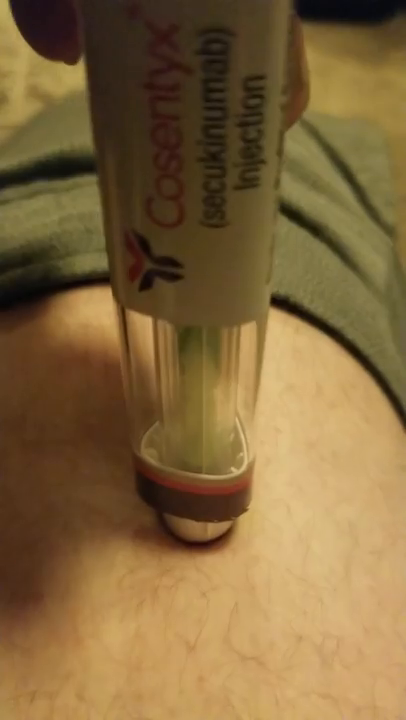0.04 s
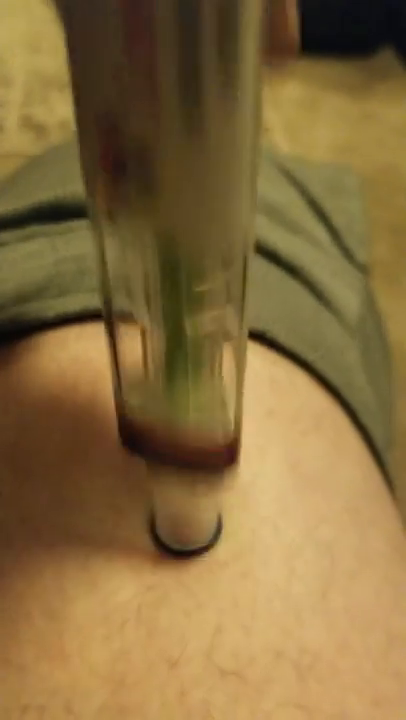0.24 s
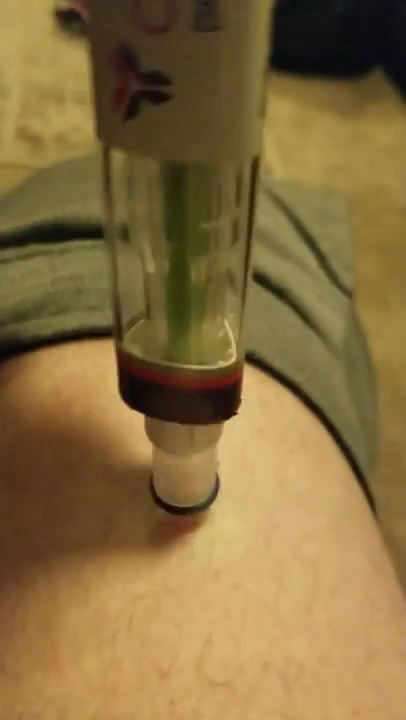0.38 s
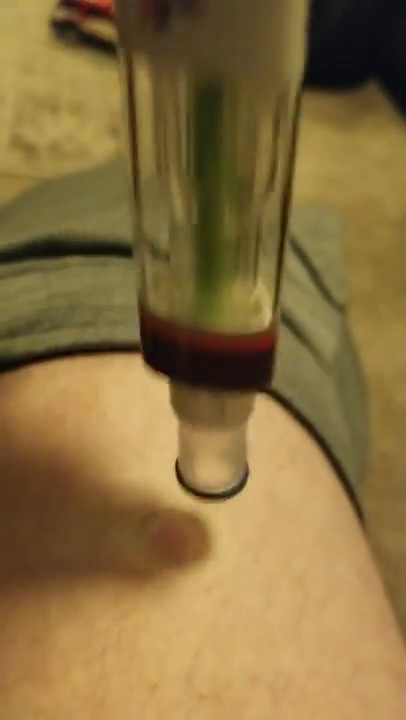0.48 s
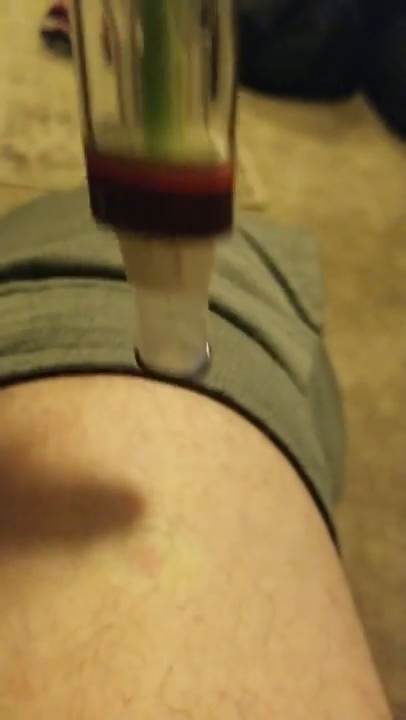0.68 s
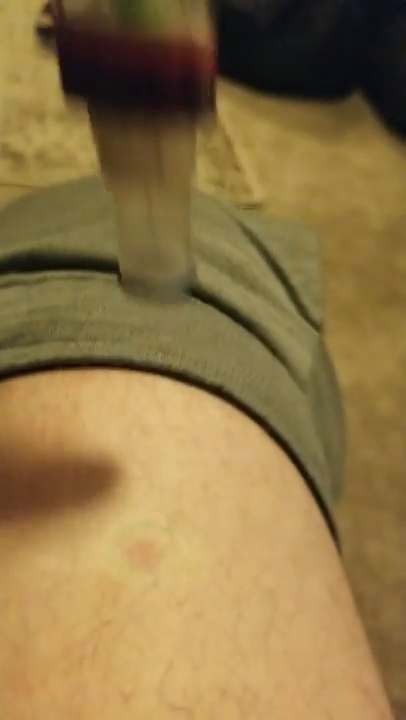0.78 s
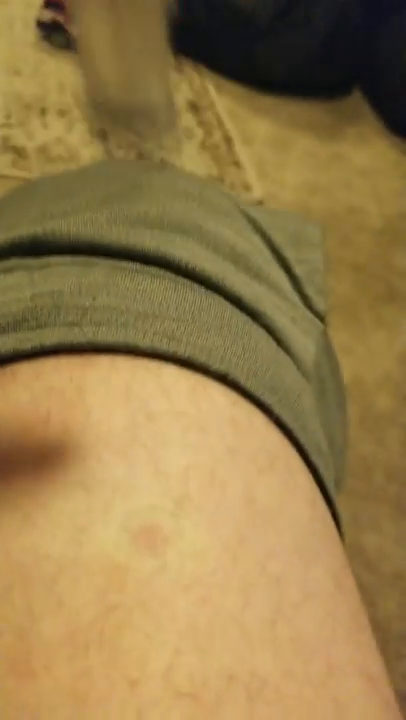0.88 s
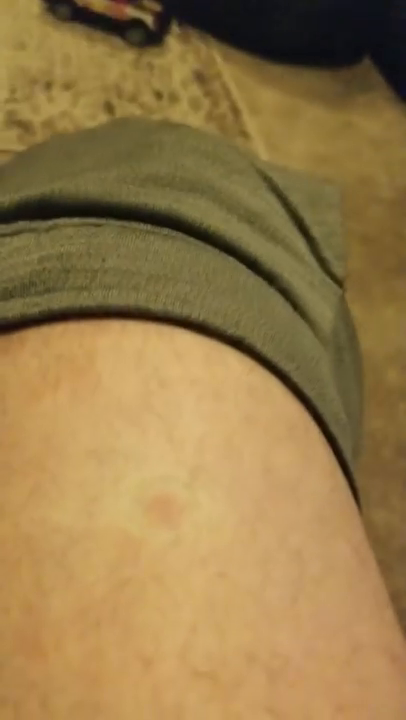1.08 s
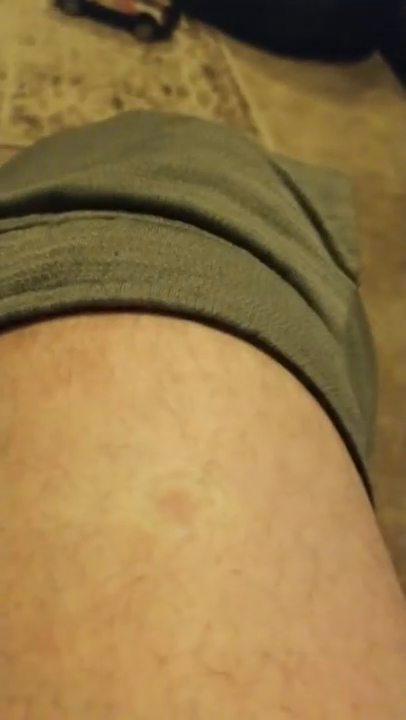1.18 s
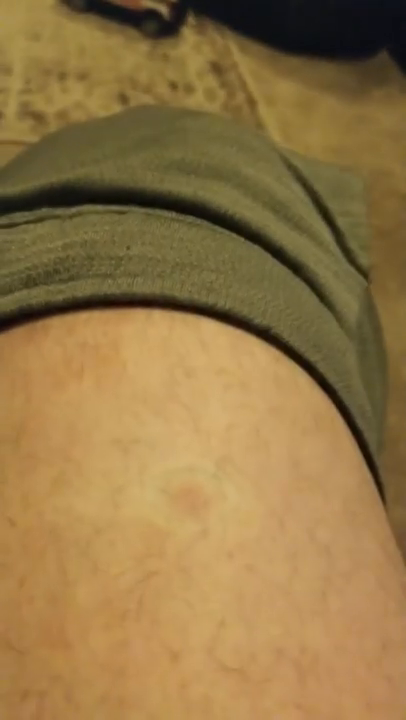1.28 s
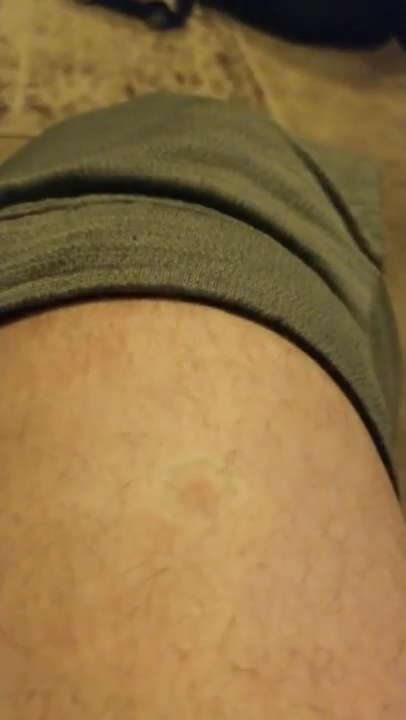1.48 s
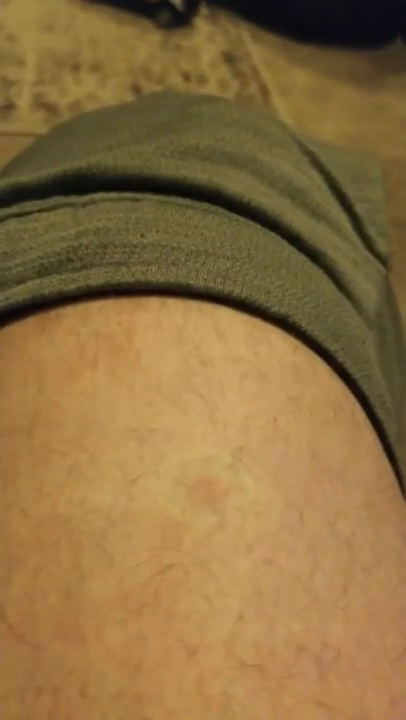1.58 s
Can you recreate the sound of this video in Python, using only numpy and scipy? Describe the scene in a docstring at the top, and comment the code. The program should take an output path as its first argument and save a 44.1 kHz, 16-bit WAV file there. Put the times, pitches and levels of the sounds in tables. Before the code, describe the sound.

Injector pen's plastic needle guard snaps out with one crisp, bright click in a quiet room

```python
"""A small room: an injector pen is lifted off the skin close to the left port of a phone. A latch lets go and the
spring drives the plastic needle guard down its rails to snap and rattle at its stop: pushes and dense slips
ring the shell's modes. Decaying noise bands form the room echo; shaped noise and wavering sines form rumble
and mains hum. Near the right port, grainy noise rustles like cloth or a hand and a soft noise band whooshes."""
import sys
import numpy as np
from scipy import signal
from scipy.fft import rfft, irfft
from scipy.io import wavfile
from scipy.ndimage import uniform_filter1d, map_coordinates

SR = 44100
rng = np.random.default_rng(int(sys.argv[2]) if len(sys.argv) > 2 else 0)


def nominal_scale(level):
    """Amplitude ratio for a level in decibels (scalar or array-like)."""
    x = np.asarray(level, float) / 20
    return 10 ** x


def generate_wav(signal):
    """Clip the signal to [-1, 1] and save it as 16-bit WAV at the path in sys.argv[1]."""
    frames = np.transpose(np.atleast_2d(signal))
    scaled = np.clip(frames, -1, 1) * 32767
    pcm = np.round(scaled).astype(np.int16)
    wavfile.write(sys.argv[1], SR, pcm)


N = 72765  # samples

# broad crack of a contact: (frequency [Hz], gain [dB])
CRACK_GAIN = [(200, -31.5), (1000, -16.5), (2500, -6), (4500, 1.5), (8000, -5), (12000, -5), (15500, -7.5),
              (17000, -15.5)]


def curve(rows):
    """Levels of a time table, interpolated to one value per sample."""
    rows = np.array(rows)
    return np.interp(np.arange(N) / SR, rows[:, 0], rows[:, 1])


def gains(rows, col=1, size=N):
    """Column of a frequency table, interpolated over log frequency to one value per bin."""
    rows = np.array(rows)
    log_hz = np.log(np.fft.rfftfreq(size, 1 / SR) + 1)
    return np.interp(log_hz, np.log(rows[:, 0]), rows[:, col])


def causal(x, rows):
    """Minimum-phase filter from (frequency [Hz], gain [dB]), through the folded cepstrum."""
    cep = irfft(np.log(nominal_scale(gains(rows, size=2048))))
    cep = np.r_[cep[0], 2 * cep[1:1024], np.zeros(1024)]
    impulse = irfft(np.exp(rfft(cep)))[:1024]
    return signal.fftconvolve(x, impulse)[:N]


def ring(x, hz, t60_s):
    """One decaying mode: a one-pole complex resonator."""
    pole = np.exp(2j * np.pi * hz / SR - np.log(1000) / (t60_s * SR))
    return signal.lfilter([1], [1, -pole], x).imag


def walk(rate_hz):
    """Slow random drift of spread 1: held noise, smoothed twice."""
    k = int(SR / rate_hz)
    held = np.repeat(rng.standard_normal(N // k + 1), k)
    drift = uniform_filter1d(uniform_filter1d(held, k), k)[:N]
    return drift / drift.std()


def shell(x, damp=1):
    """Modes of shell and guard; contacts land in different places, so each mode starts with either sign."""
    # modes: (frequency [Hz], level [dB], undamped t60 [s])
    modes = [(300, -34.5, .02), (480, -30.5, .015), (760, -34, 0.016), (1100, -21, 0.013),
             (1509, -25.5, .025), (2250, -19, 0.011), (2830, -13.5, .016), (3805, -14, 0.011),
             (4260, -7, 0.0093), (5042, -9.5, 0.034), (6100, -8.5, .012), (6603, -17, 0.013),
             (7384, -6.5, .01), (8160, -7, .012), (9320, -8, 0.0064), (10303, -7.5, 0.0089),
             (11650, -8, .007), (13500, -4, .007), (15300, -11.5, .005)]
    signs = rng.choice([-1, 1], (len(modes), N // 8 + 1))
    signs = np.repeat(signs, 8, axis=1)[:, :N]  # each held for 8 samples
    return sum(nominal_scale(db) * ring(x * sign, hz, damp * t60_s) for sign, (hz, db, t60_s) in zip(signs, modes))


def blows():
    """Each blow is a short bell-shaped push that rings the shell and the stop, with a broad crack."""
    # blows: (time [s], shell push [dB], snap push [dB], contact = 2 sigma [ms])
    hits = [(.2066, -22, -60, .03), (.2074, -21, -60, .03), (.2083, -22, -60, .03), (.2125, -14, -60, .5),
            (.2145, -27, -60, .02), (.2180, -16, -60, .5), (.2246, -28, -50, .04), (.2457, -22, -30, .05),
            (.25093, -9, -.8, .03), (.2524, -11, -25, .03), (.2532, -11, -18, .04), (.2543, -8, -40, .25),
            (.2560, -15, -25, .05), (.2615, -24, -45, .05)]
    snap_hz, snap_t60_s = 3400, .0015
    radiates_hz = 2400  # the stop is a poor source below this
    crack_db = 4
    t = np.arange(N) / SR
    shell_push, snap_push = np.zeros(N), np.zeros(N)
    for time_s, shell_db, snap_db, contact_ms in hits:
        bell = np.exp(-.5 * ((t - time_s) / (contact_ms / 2000)) ** 2)
        bell = bell / bell.sum()
        shell_push += nominal_scale(shell_db) * bell
        snap_push += nominal_scale(snap_db) * bell
    snap = ring(ring(snap_push, snap_hz, snap_t60_s), snap_hz, snap_t60_s)  # swells, then dies
    snap = signal.lfilter(*signal.butter(2, radiates_hz, "high", fs=SR), snap)
    snap = snap * 2 * np.e * np.log(1000) / (snap_t60_s * SR)  # offsets the level of the double ring
    return shell(shell_push) + nominal_scale(crack_db) * causal(shell_push, CRACK_GAIN) - snap


def slide():
    """Guard scraping on its rails and rattling: dense uneven slips ring the damped shell and crack."""
    # scrape and rattle: (time [s], level [dB])
    slide_level = [(.186, -110), (.190, -63), (.200, -50), (.2062, -51), (.2067, -27), (.2095, -30),
                   (.211, -33), (.221, -33), (.226, -29.5), (.245, -27), (.2507, -30), (.2513, -16),
                   (.2552, -20.5), (.2572, -27), (.262, -30), (.2635, -37), (.272, -51), (.28, -110)]
    slips_per_s, slip_spread_db, crack_db = 14000, 1.6, 1.5
    damp = .7  # share of t60 while the parts touch
    slips = (rng.random(N) < slips_per_s / SR) * rng.choice([-1, 1], N)
    slips = slips * nominal_scale(slip_spread_db * rng.exponential(size=N))
    shaped = slips * nominal_scale(curve(slide_level))
    ringing = shell(shaped, damp) / shell(slips, damp).std()
    crack = causal(shaped, CRACK_GAIN) / causal(slips, CRACK_GAIN).std()
    return (ringing + nominal_scale(crack_db) * crack) / np.hypot(1, nominal_scale(crack_db))


def pen():
    """Blows and slide, high-passed: the small pen is a poor source of bass."""
    body_low_hz = 240
    return signal.lfilter(*signal.butter(2, body_low_hz, "high", fs=SR), blows() + slide())


def ports(x):
    """Direct sound: unchanged at the left port, later and coloured at the right."""
    # right port relative to left: (frequency [Hz], gain [dB])
    far_gain = [(300, -4.5), (1300, -10), (2400, -19), (3200, -16), (4500, -14), (5700, -8.5), (7000, -14),
                (8200, -29), (9800, -12.5), (11500, -20.5), (13500, -30.5), (16000, -39.5)]
    lag_ms = .48
    late = map_coordinates(x, [np.arange(N) - lag_ms * SR / 1000], mode="nearest")
    return np.array([x, causal(late, far_gain)])


def room(x):
    """Diffuse echo: noise bands, each fading at its own pace, unrelated at the two ports."""
    # echo bands: (centre [Hz], left [relative dB], right [relative dB], early t60 [s])
    bands = [(720, -31.5, -30, 0.37), (1400, -32, -30.5, 0.36), (2660, -40.5, -43.5, .3),
             (3403, -48.5, -49.5, 0.39), (4250, -42, -44, .3), (5500, -36, -35.5, .28),
             (7550, -35, -41.5, .28), (10000, -39.5, -38.5, .2), (14000, -35, -41, .16)]
    first_s, rise_s = .022, .014
    late_db, late_t60_s = -24, .9  # fainter, longer echo from further off
    t, echo = np.arange(SR // 2) / SR, 0
    rise = np.clip((t - first_s) / rise_s, 0, 1)
    late = nominal_scale(late_db) * 1000 ** (-t / late_t60_s)
    for hz, left_db, right_db, t60_s in bands:
        edges_hz = [hz / 1.2, min(hz * 1.2, SR * .45)]
        sos = signal.butter(2, edges_hz, "band", fs=SR, output="sos")
        fade = rise * (1000 ** (-t / t60_s) + late)
        fade = fade / np.sqrt((fade ** 2).sum())
        band = signal.sosfilt(sos, rng.standard_normal((2, len(t)))) * fade
        echo = echo + nominal_scale(np.array([[left_db], [right_db]])) * band * np.sqrt(SR / hz)
    return signal.fftconvolve(x[None], echo, axes=1)[:, :N]


def rustle():
    """Fibres catching: fine noise grains through the port's resonances, far fainter on the left."""
    # spectrum: (frequency [Hz], relative level [dB per Hz])
    rustle_spectrum = [(1500, -11.5), (2800, -11.5), (3500, -8), (4900, 3), (5800, 1), (6600, -14),
                       (7700, -21), (8600, -11), (9500, -5), (10300, -18.5), (14000, -26)]
    # right port: (time [s], level [dB])
    rustle_level = [(0, -92), (.04, -79.5), (.1, -73), (.18, -64), (.3, -72), (.42, -69), (.45, -65),
                    (.53, -64.5), (.595, -64), (.64, -70.5), (.72, -78), (.9, -83), (1.1, -79.5),
                    (1.25, -84.5), (1.4, -78), (1.65, -79)]
    left_db = -26
    grains = rng.standard_normal((2, N)) * nominal_scale(1.1 * walk(60))
    x = irfft(rfft(grains) * nominal_scale(gains(rustle_spectrum)), N)
    return x / x.std() * nominal_scale(curve(rustle_level)) * nominal_scale(np.array([[left_db], [0]]))


def whoosh():
    """A narrow band of air noise swells and fades, mostly at the right port."""
    # right port: (time [s], level [dB])
    whoosh_level = [(.45, -95), (.62, -68.5), (.8, -69.5), (.92, -75.5), (1.2, -84), (1.4, -100)]
    centre_hz, width_hz, left_db = 1747, 260, -9
    hz = np.fft.rfftfreq(N, 1 / SR)
    band = np.exp(-((hz - centre_hz) / width_hz) ** 2)
    x = irfft(rfft(rng.standard_normal((2, N))) * band, N)
    return x / x.std() * nominal_scale(curve(whoosh_level)) * nominal_scale(np.array([[left_db], [0]]))


def tone():
    """Room tone: noise partly shared by the ports, with a wandering bass, and wavering mains hum."""
    # before the level curves: (frequency [Hz], left [dB per Hz], right [dB per Hz], likeness [0-1])
    tone_spectrum = [(19.97, -100, -100, 0.9), (38, -93.5, -90, .86), (55, -86.5, -85, 1),
                     (108.2, -78.5, -82, .9), (160, -91, -91, 0.4), (213, -87, -88, 0.9),
                     (405, -93, -91.5, 0.8), (533, -100, -92, 0.6), (850, -104, -92, 0.3),
                     (1350, -100, -95.5, 0), (1594, -108, -98.5, 0.1), (2100, -115, -113, 0),
                     (2800, -118, -118, 0), (4500, -118, -116, 0), (6000, -120, -119, 0.2),
                     (8000, -124, -125, 0), (15000, -122, -122, 0.08)]
    # all but the deep bass: (time [s], level [dB])
    upper_level = [(0, 4), (.4, 2.5), (.8, 0), (1.1, -1), (1.4, -0.5), (1.65, 1)]
    # deep bass and hum: (time [s], level [dB])
    deep_level = [(0, -5), (.04, 5), (.1, 5), (.13, 1), (.25, 2), (.28, 8), (.35, 6), (.38, -1), (.9, -2),
                  (1.65, -1.5)]
    # mains hum before its level curve: (frequency [Hz], level [dB rms])
    hum_lines = [(60, -67), (120, -72)]
    same = np.clip(gains(tone_spectrum, col=3), 0, 1)
    a, b = rfft(rng.standard_normal((2, N)))
    shared, opposed = np.sqrt(1 + same) * a, np.sqrt(1 - same) * b
    left = (shared + opposed) * nominal_scale(gains(tone_spectrum, col=1))
    right = (shared - opposed) * nominal_scale(gains(tone_spectrum, col=2))
    noise = np.array([left, right]) * np.sqrt(SR / 4)

    hz, t = np.fft.rfftfreq(N, 1 / SR), np.arange(N) / SR
    low_share = 1 / (1 + (hz / 400) ** 2)
    deep_share = 1 / (1 + (hz / 110) ** 4)
    hum = 0
    for hum_hz, db in hum_lines:
        level = np.sqrt(2) * nominal_scale(db + 1.2 * walk(23))
        hum = hum + level * np.sin(2 * np.pi * (hum_hz * t + rng.random()))
    deep = (irfft(noise * deep_share, N) + hum) * nominal_scale(curve(deep_level))
    bass = irfft(noise * (low_share - deep_share), N) * nominal_scale(1.8 * walk(2.8) + curve(upper_level))
    treble = irfft(noise * (1 - low_share), N) * nominal_scale(curve(upper_level))  # mids and hiss
    return deep + bass + treble


def scene():
    """The pen at both ports, its echo, the rustle, the whoosh and the room tone."""
    dry_pen = pen()
    return ports(dry_pen) + room(dry_pen) + rustle() + whoosh() + tone()


def band_limit(x):
    """A steep low-pass at the top of the band."""
    return signal.sosfilt(signal.butter(12, 16960, fs=SR, output="sos"), x)


def record(dry):
    """The phone cuts the top with a steep elliptic low-pass."""
    top_hz = 15800
    mix = signal.sosfilt(signal.ellip(10, .2, 40, top_hz, fs=SR, output="sos"), dry)
    return band_limit(mix)


dry = scene()
out = record(dry)
generate_wav(out)
```